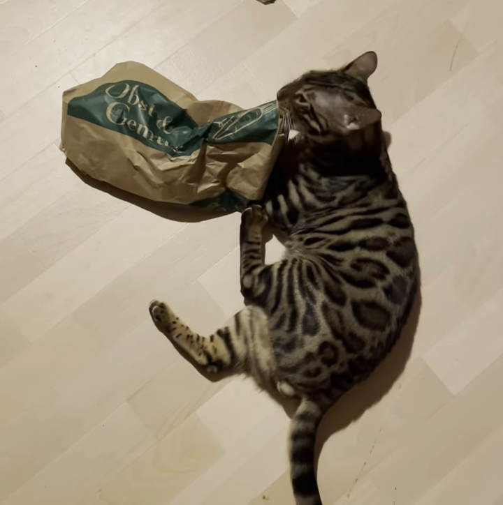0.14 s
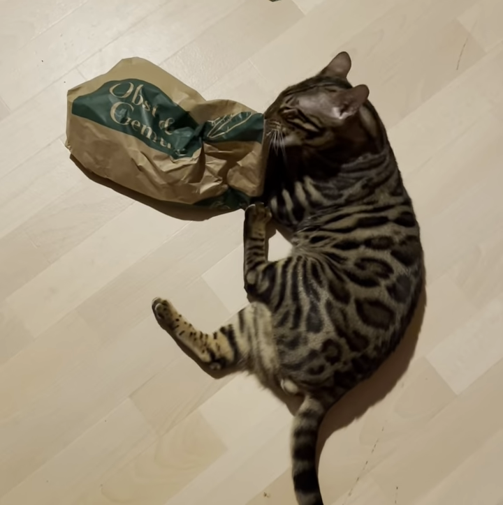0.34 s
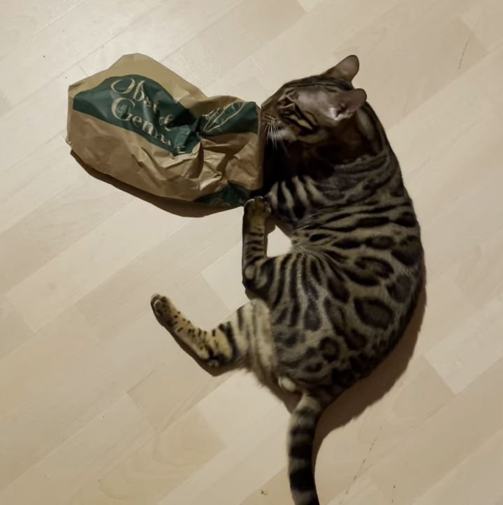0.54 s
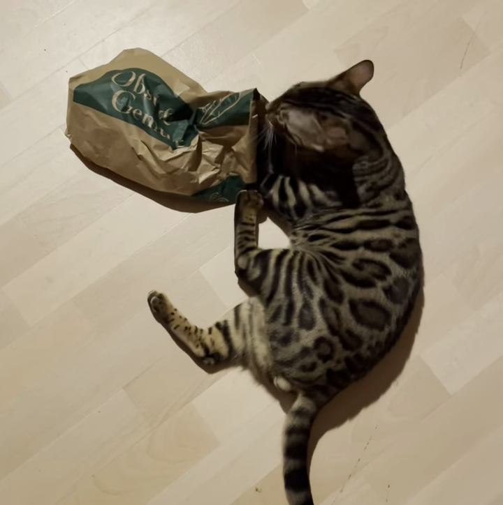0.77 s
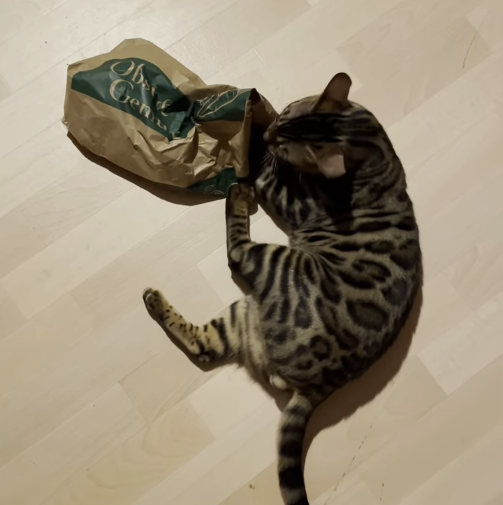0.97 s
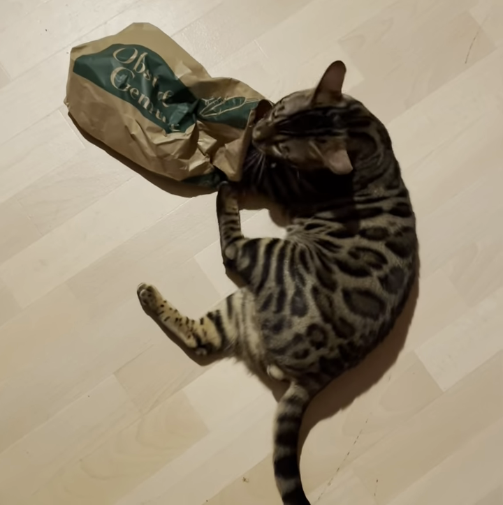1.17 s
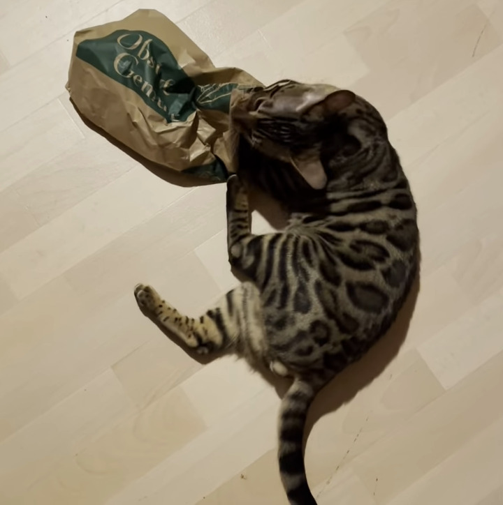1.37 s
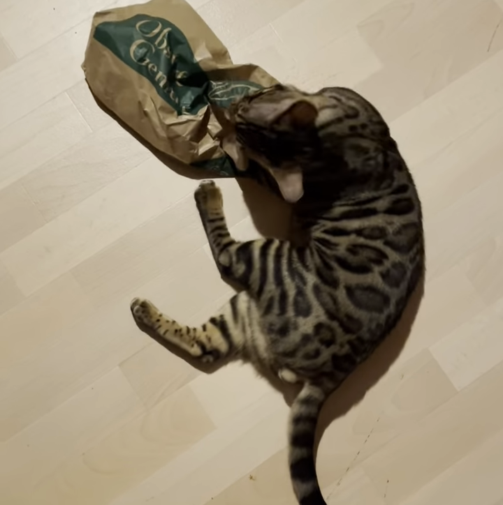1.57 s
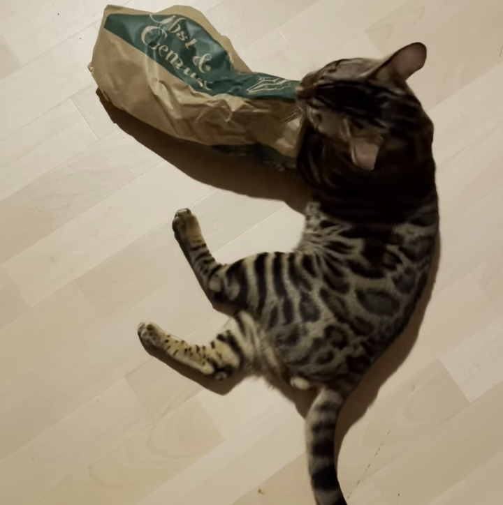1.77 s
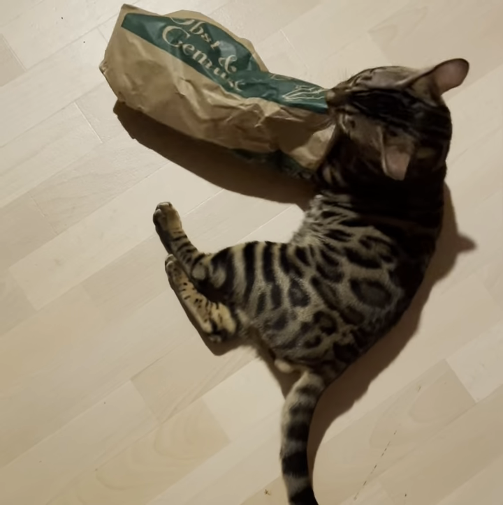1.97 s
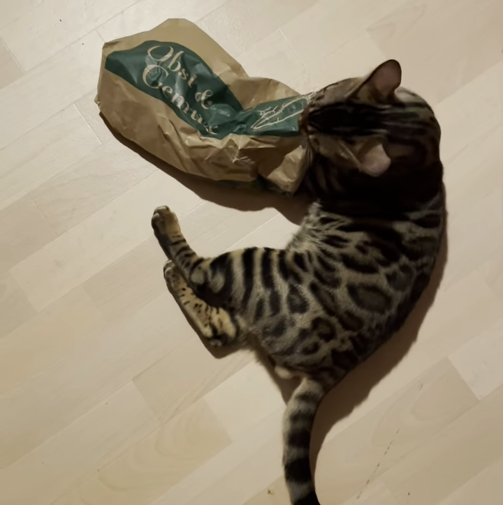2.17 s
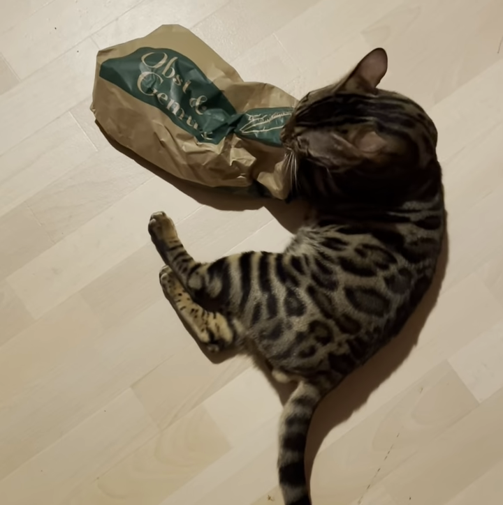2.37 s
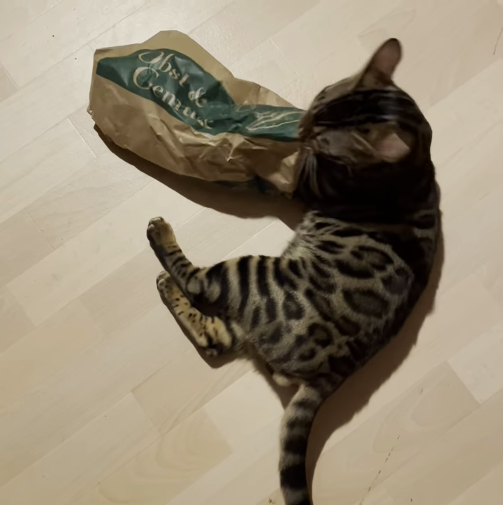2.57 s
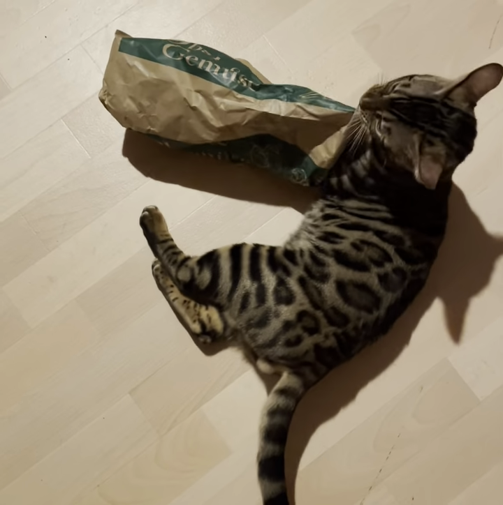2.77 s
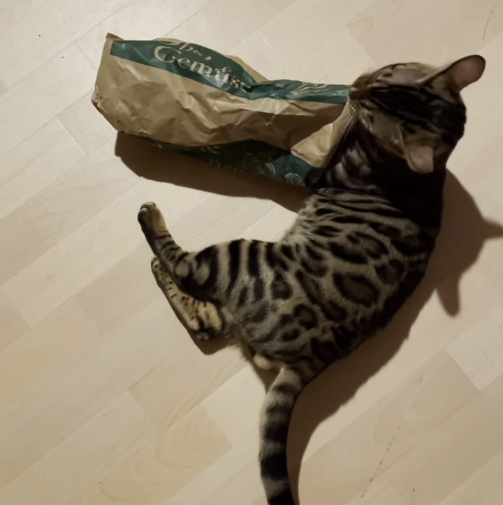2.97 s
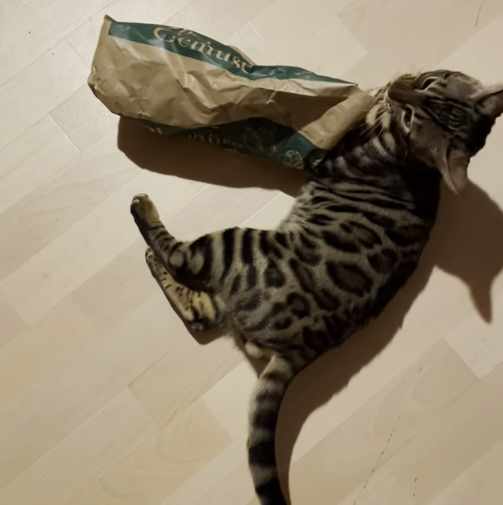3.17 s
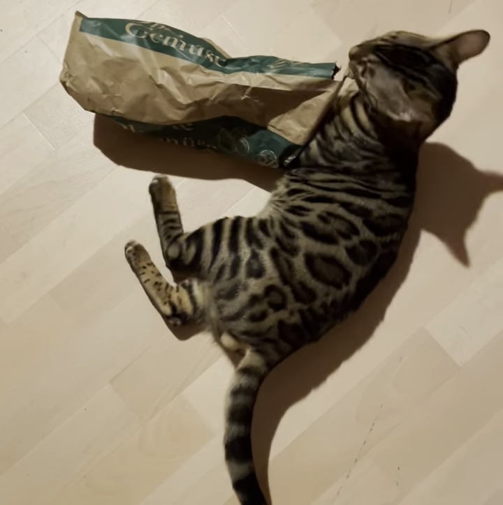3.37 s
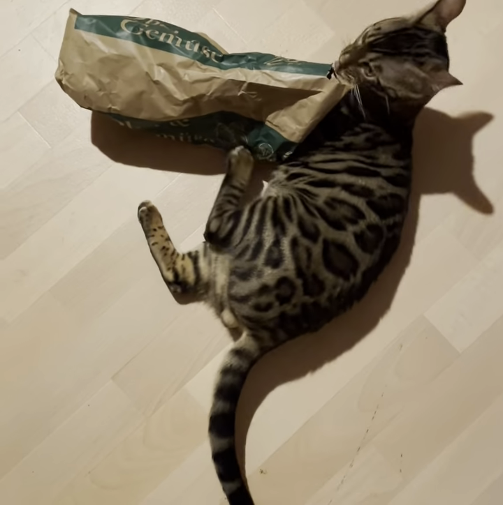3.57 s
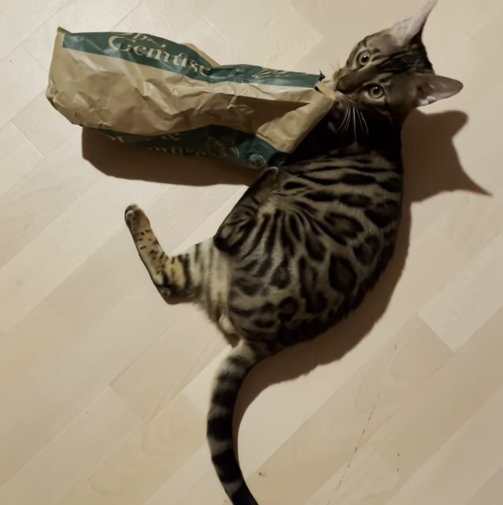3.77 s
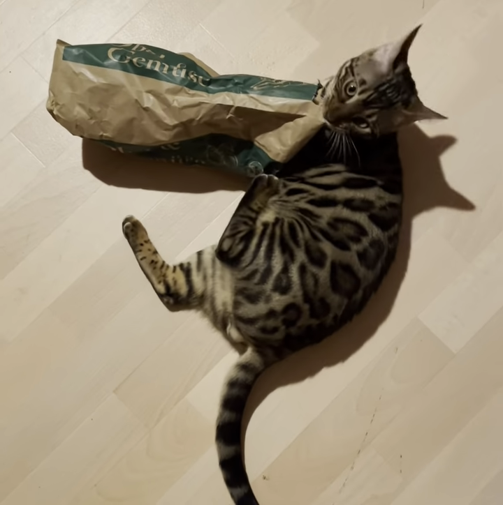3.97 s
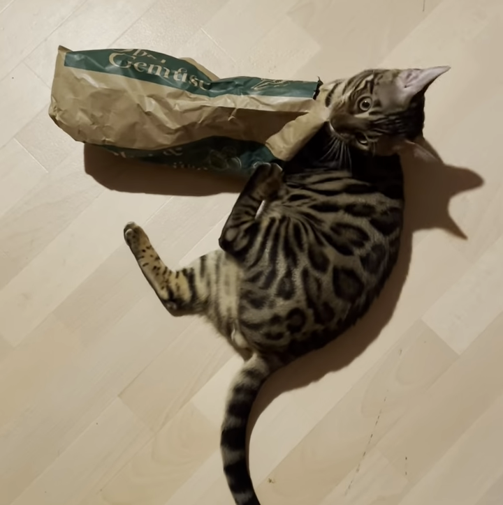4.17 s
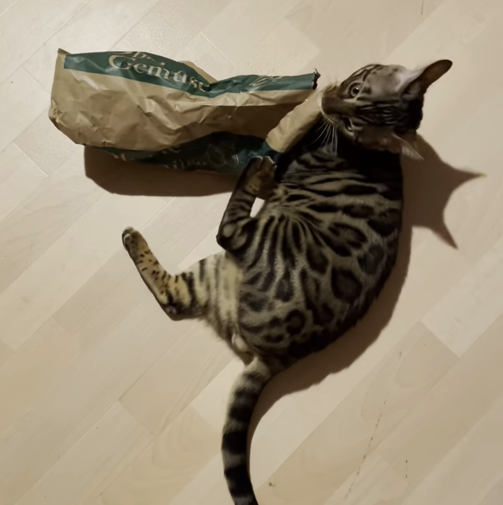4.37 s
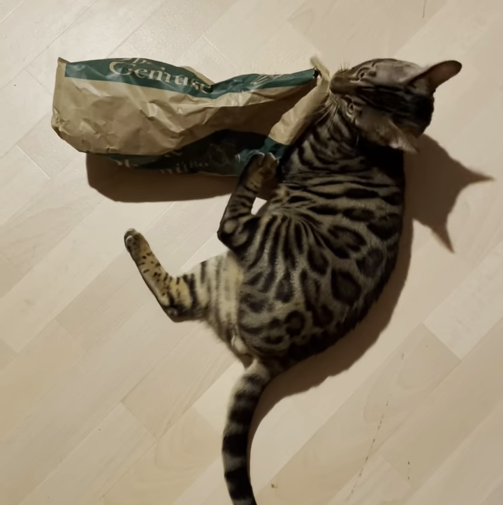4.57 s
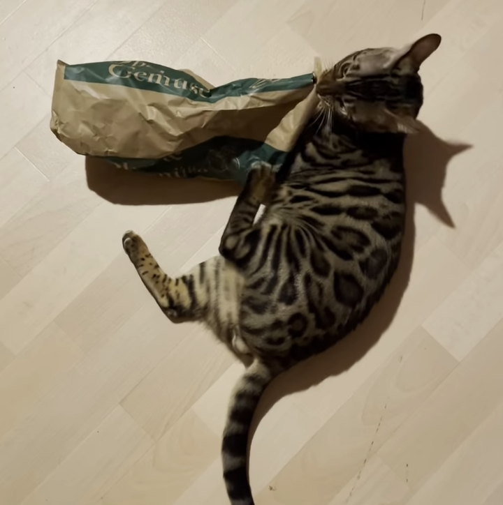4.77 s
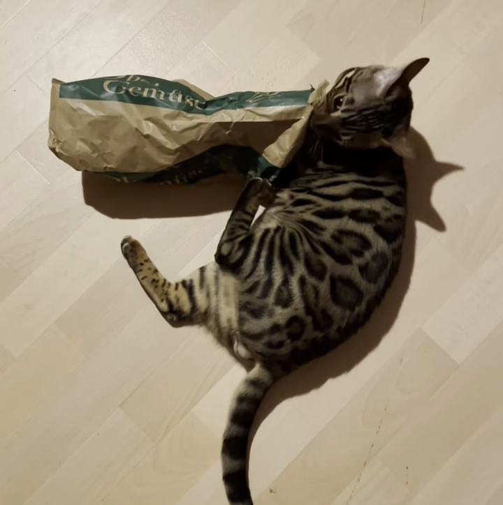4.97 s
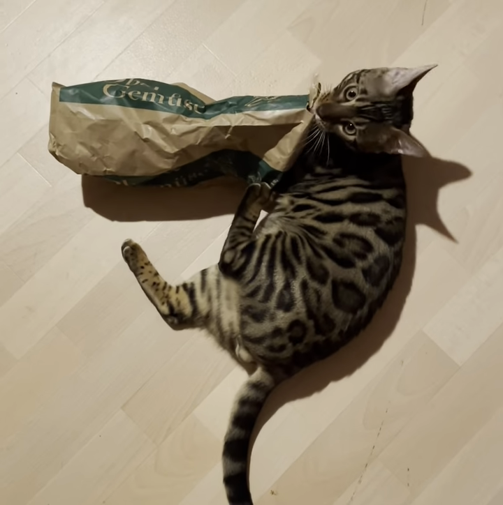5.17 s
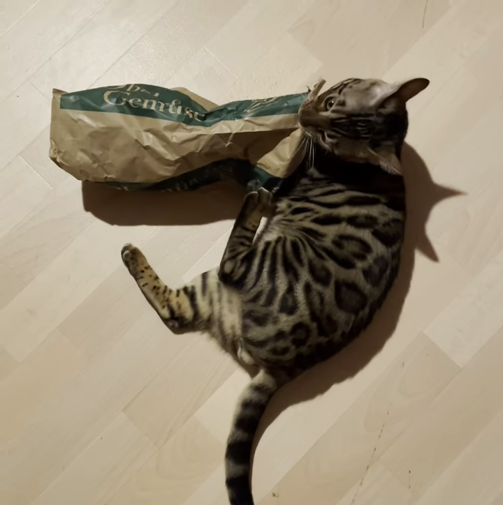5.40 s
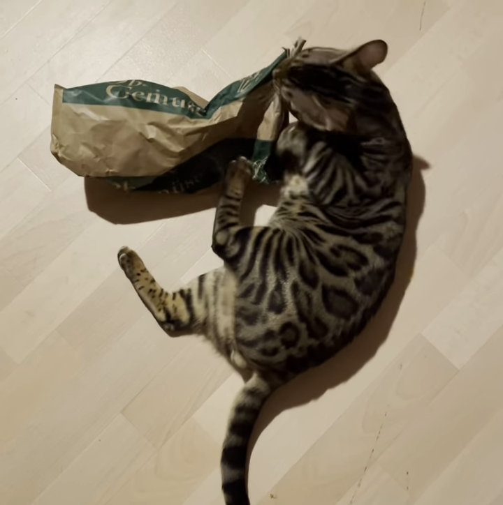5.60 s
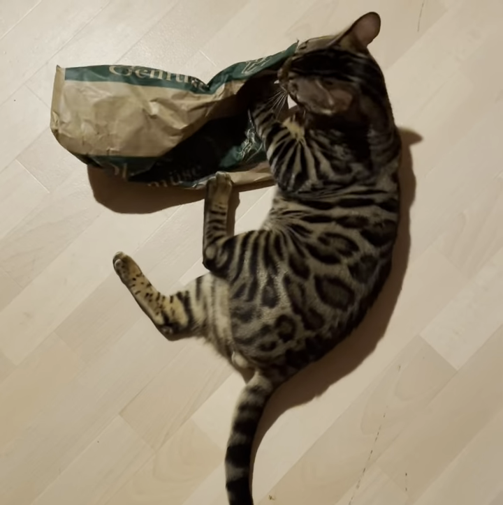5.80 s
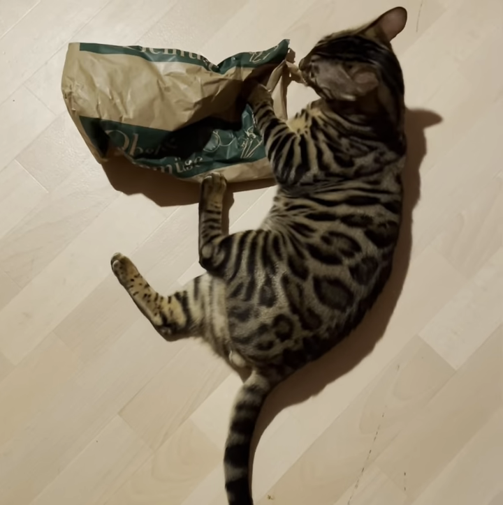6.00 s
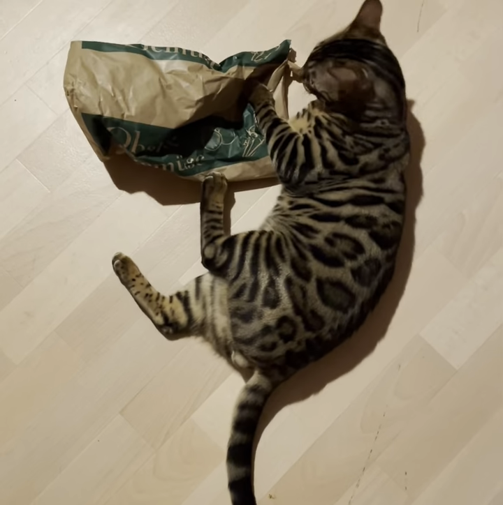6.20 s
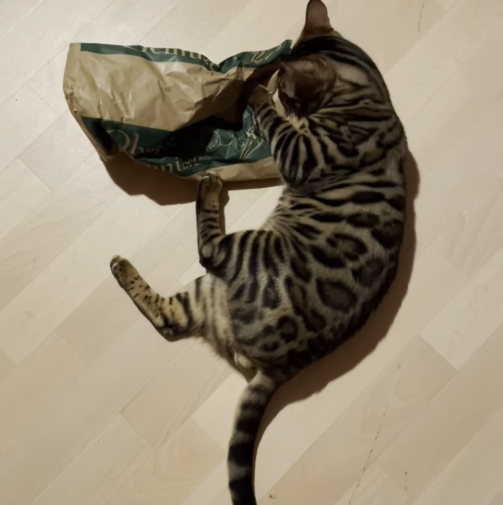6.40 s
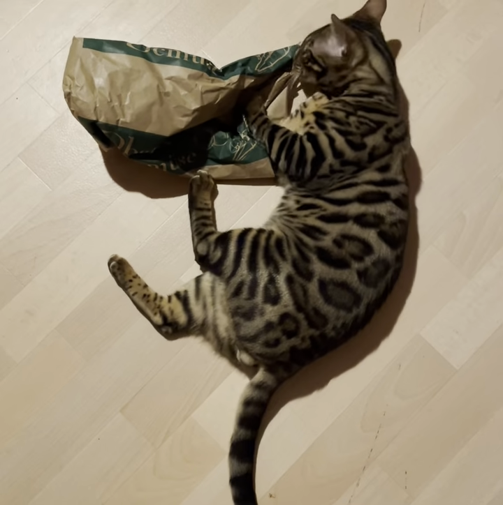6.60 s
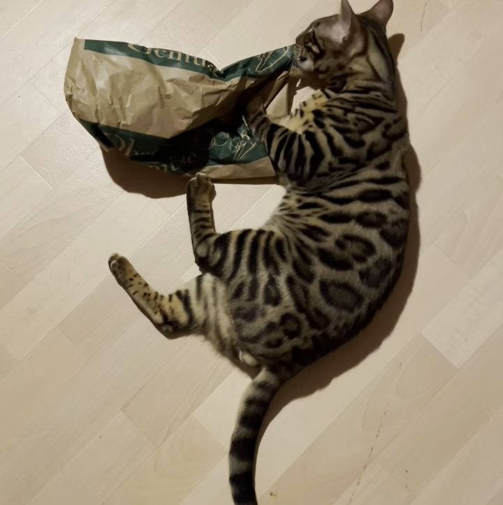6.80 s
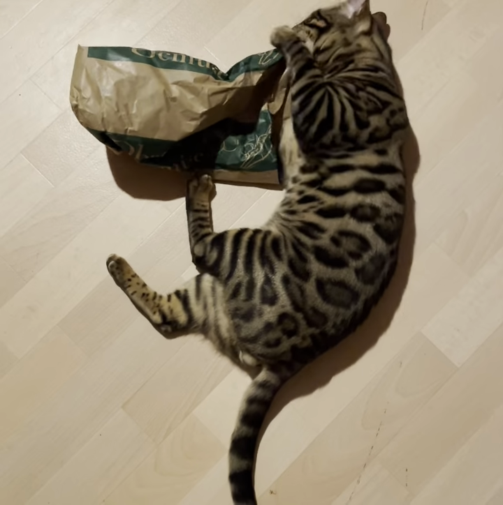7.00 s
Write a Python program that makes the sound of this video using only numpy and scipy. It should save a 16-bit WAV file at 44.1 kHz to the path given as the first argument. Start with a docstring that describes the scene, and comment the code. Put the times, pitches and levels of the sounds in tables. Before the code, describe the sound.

A cat chews and paws a stiff paper bag on a wooden floor, giving irregular bright crackles, sharp crease snaps and a few dull thumps.

```python
"""In a bare, lively room with a wooden floor, a cat lies chewing, tugging and pawing at a paper bag.
Creases snap as shaped noise bursts; folds, stiff creases and wide panels crackle under each move.
Short and long paper tones are noise through a narrow resonance, a tooth squeaks once as an unsteady
sine, and dull knocks and booming slaps come off the floor.
Decaying noise and standing waves give the room, over a faint steady hiss."""
import sys
import numpy as np
from scipy import signal
from scipy.fft import rfft, irfft, next_fast_len
from scipy.io import wavfile
from scipy.ndimage import uniform_filter1d

SR = 44100
rng = np.random.default_rng(int(sys.argv[2]) if len(sys.argv) > 2 else 0)


def int16_out(signal):
    """Quantize to a 16-bit WAV file."""
    q = np.round(np.clip(np.atleast_2d(signal).T, -1, 1) * 32767)
    wavfile.write(sys.argv[1], SR, q.astype(np.int16))


N = 310905


def amp(db):
    """Decibels to gain."""
    return 10 ** (np.asarray(db) / 20)


def unit(x):
    """Scale to rms 1."""
    return x / np.sqrt(np.mean(x ** 2) + 1e-20)


def along(points, hz):
    """Read (frequency, value) points on a log frequency axis."""
    point_hz, values = np.transpose(points)
    return np.interp(np.log(hz + 1), np.log(point_hz), values)


def curves(rows):
    """One value per sample for each column after the time."""
    times, *columns = np.transpose(rows)
    return [np.interp(np.arange(N) / SR, times, column) for column in columns]


def filtered(x, response):
    """Multiply the spectrum of x by a complex response of frequency."""
    n = x.shape[-1]
    padded = next_fast_len(n + SR // 2)
    spectrum = rfft(x, padded) * response(np.fft.rfftfreq(padded, 1 / SR))
    return irfft(spectrum, padded)[..., :n]


def coloured(x, spectrum, size=4096):
    """Causal minimum-phase filter of energy 1, so the table sets only the colour."""
    cepstrum = irfft(np.log(amp(along(spectrum, np.fft.rfftfreq(size, 1 / SR)))))
    # folding the cepstrum forward puts the energy as early as possible
    cepstrum[1:size // 2] *= 2
    cepstrum[size // 2:] = 0
    pulse = irfft(np.exp(rfft(cepstrum)))
    return signal.fftconvolve(x, pulse / np.linalg.norm(pulse))[:N]


# correlation of left and right in the diffuse noise, limited to -1..1 in use; opposed at the very top:
# (frequency [Hz], correlation [-])
CORRELATION = [(100, .998), (300, 0.95), (640, 0.81), (1400, 0.19), (3000, 0.32), (7000, -0.15),
               (11000, 0.79), (14000, -1.6)]


def diffuse(n):
    """Wide stereo noise: alike in the bass, loosely related above it, opposed at the very top."""
    def mid_side_gains(hz):
        turn = np.arccos(np.clip(along(CORRELATION, hz), -1, 1)) / 2
        return np.array([np.cos(turn), np.sin(turn)])

    mid, side = filtered(rng.standard_normal((2, n)), mid_side_gains)
    return np.array([mid + side, mid - side])


# colour of the room hiss: (frequency [Hz], relative level [dB])
AIR_COLOUR = [(25, -9), (45, 9.5), (70, -9.5), (98, 18.5), (125, 9), (200, 5), (500, 4.5), (1200, 3),
              (2500, 0), (5000, -3.5), (8000, -13), (13000, -8), (16000, -41.5)]


def air():
    """The faint steady hiss of the room, as coloured diffuse noise."""
    hiss = filtered(diffuse(N), lambda hz: amp(along(AIR_COLOUR, hz)))
    return amp(-77.0) * unit(hiss)


# how long the room rings: (frequency [Hz], time to fall 60 dB [s])
ROOM_DECAY = [(80, 0.15), (250, 0.41), (1000, 0.54), (4000, 0.52), (8000, 0.5), (14000, 0.28)]
# strength of the tail: (frequency [Hz], level relative to the direct sound [dB])
TAIL_LEVEL = [(100, 9.5), (500, -3), (1500, -1.5), (5000, -2), (10000, -1.5), (15000, 1)]


def room_tail():
    """The answer of the room: it builds up within milliseconds, and the middle lasts longest."""
    hz, t, noise = signal.stft(diffuse(SR), SR, nperseg=256)
    decay = amp(-60 * t / along(ROOM_DECAY, hz)[:, None])
    build_up = 1 - np.exp(-t / 0.0015)
    early = 1 + 1.0 * np.exp(-t / 0.021)  # floor and near walls answer first
    fade = decay * build_up * early
    fade *= amp(along(TAIL_LEVEL, hz))[:, None] / np.sqrt(SR * np.mean(fade ** 2, axis=1, keepdims=True))
    return signal.istft(noise * fade, SR, nperseg=256)[1]


# standing waves between the walls: (frequency [Hz], width [Hz], level before halving [dB])
STANDING_WAVES = [(76, 2.3, -9), (101.8, 7.9, 10.5), (135.9, 9.7, 12.5), (195.4, 6.3, 8.5)]


def standing_waves(hz):
    """Damped resonances between the walls, added to the plain response."""
    modes = sum(amp(db) * 1j * hz * width / (centre * centre - hz * hz + 1j * hz * width)
                for centre, width, db in STANDING_WAVES)
    return 1 + modes / 2


def room(x, count=10):
    """The echoes are drawn anew for each stretch as the bag moves about; the standing waves stay."""
    out = np.zeros((2, N + 2 * SR))
    for part in np.array_split(np.arange(N), count):
        wet = signal.fftconvolve(x[part][None], room_tail(), axes=1)
        out[:, part[0]:part[0] + wet.shape[1]] += wet
    return filtered(out[:, :N], standing_waves)


# balance of the direct sound: (frequency [Hz], left minus right [dB])
LEFT_BALANCE = [(200, 4.5), (500, -1.5), (1100, 0), (2000, 8), (4000, 0.5), (12000, 1)]


def direct_sound(bag):
    """The bag lies a little to the left: the left channel leads slightly, with its own tone balance."""
    lag_ms = 0.019

    def left(hz):
        # half the difference goes to each side
        return amp(along(LEFT_BALANCE, hz) / 2) * np.exp(1j * np.pi * hz * lag_ms / 10 ** 3)

    return filtered(bag, lambda hz: np.array([left(hz), 1 / left(hz)]))


def crackle(rate, spread_db, t60, rub_db):
    """Tiny bursts of very unequal size at random moments, over the even hiss of sliding paper; rms 1."""
    starts = rng.random(N) < rate / SR  # rate in bursts per second
    sizes = amp(spread_db * np.clip(rng.standard_normal(N), -2, 2))
    fade = amp(-60 * np.arange(SR // 10) / SR / t60)
    power = np.abs(signal.fftconvolve(starts * sizes ** 2, fade ** 2)[:N])
    envelope = np.sqrt(power / power.mean() + amp(rub_db) ** 2)
    return unit(envelope * rng.standard_normal(N))


# every move takes hold quickly, eases off while it lasts, and then the paper settles
ATTACK_DB_PER_S, EASE_DB_PER_S, SETTLE_DB_PER_S = 596, 10, 245.5


def efforts(moves):
    """One gain curve for each level column: every move rises, holds with a slight sag, and settles."""
    t = np.arange(N) / SR
    power = np.zeros((len(moves[0]) - 2, N))
    for start, length, *levels_db in moves:
        near = slice(max(0, round(start * SR) - SR // 4), round((start + length) * SR) + SR // 2)
        age = t[near] - start
        attack_db = ATTACK_DB_PER_S * np.minimum(age, 0)  # the rise comes before the start time
        ease_db = EASE_DB_PER_S * np.maximum(age, 0)
        settle_db = SETTLE_DB_PER_S * np.maximum(age - length, 0)
        power[:, near] += np.outer(amp(levels_db), amp(attack_db - ease_db - settle_db)) ** 2
    return np.sqrt(power)


# the cat rolls its weight onto the floor: (start time [s], length [s], level [dB])
WEIGHT_SHIFTS = [(.02, 1, -80), (1.05, 0.18, -79), (1.48, .04, -77), (1.69, 0.23, -74.5),
                 (2.02, 0.063, -73), (2.67, 0.32, -65.5), (3.02, 0.089, -63), (3.2, 0.085, -69),
                 (3.48, 0.13, -78), (3.93, 0.13, -83), (4.42, 0.07, -83), (4.98, 0.07, -72.5),
                 (5.58, .1, -79), (5.92, .08, -73), (7.02, .05, -84)]
# colour of the knocks: (frequency [Hz], relative level [dB])
KNOCK_COLOUR = [(25, -34), (50, -27), (75, -7), (130, -1.5), (180, -4.5), (300, -5), (600, -20.5),
                (2000, -53.5)]


def knocks():
    """Soft, dull knocks of paws and bag on the boards, as slow crackle with the treble taken off."""
    weight, = efforts(WEIGHT_SHIFTS)
    return coloured(weight * crackle(rate=80, spread_db=3, t60=.05, rub_db=-5), KNOCK_COLOUR)


# the bag is slapped against the floor: (time [s], level [dB])
SLAPS = [(2.736, -47.5), (5.926, -63.5)]
# boards and the air inside the bag: (frequency [Hz], relative level [dB], time to fall 60 dB [s])
BOOM_MODES = [(79, -8, .12), (102.3, -23, 0.15), (136.4, -26, 0.48), (173, -1.5, 0.15), (204, -0.5, 0.39),
              (340, 17, 0.041), (422, 6.5, 0.16)]


def slaps():
    """Each slap sets the boards and the air in the bag booming, as a sum of decaying sines."""
    out = np.zeros(N)
    t = np.arange(SR // 4) / SR
    ringing = sum(amp(db - 60 * t / t60) * np.sin(2 * np.pi * hz * t) for hz, db, t60 in BOOM_MODES)
    boom = ringing * (1 - np.exp(-t / 0.0013))
    for s, db in SLAPS:
        out[round(s * SR):][:len(t)] += amp(db) * boom
    return out


# stick and slip of a tooth on paper: (time [s], pitch [Hz], level [dB])
TOOTH_SLIP = [(2.019, 6860, -70), (2.025, 7130, -37), (2.037, 7350, -39), (2.047, 6850, -35),
              (2.06, 7040, -41), (2.072, 6900, -70)]


def squeak():
    """The paper slips under a tooth at a high, unsteady rate."""
    pitch_hz, db = curves(TOOTH_SLIP)
    jitter = .048 * unit(uniform_filter1d(rng.standard_normal(N), size=24))  # fraction of the pitch
    t = np.arange(N) / SR
    sounding = (t > TOOTH_SLIP[0][0]) & (t < TOOTH_SLIP[-1][0])
    phase = 2 * np.pi * np.cumsum(pitch_hz * (1 + jitter)) / SR
    return sounding * amp(db) * np.sin(phase)


# short and long narrow-band noises of the paper:
# (middle time [s], half length [s], pitch [Hz], level [dB])
NARROW_NOISES = [(0.528, 0.011, 1050, -64.5), (1.28, 0.0023, 930, -43.5), (2.05, .016, 8200, -47),
                 (3.91, 0.0042, 4640, -50), (4.432, 0.012, 945, -56), (4.748, 0.023, 960, -60),
                 (4.756, .013, 1650, -58), (5.615, 0.088, 930, -58.5), (6.066, 0.055, 7900, -55.5),
                 (6.075, 0.049, 6150, -51), (6.375, 0.012, 990, -60), (6.544, 0.024, 1740, -47.5),
                 (6.578, .03, 1110, -69)]


def narrow_paper_noises():
    """Noise swells and fades through one narrow resonance, so the paper briefly takes on a pitch."""
    out = np.zeros(N)
    t = np.arange(-SR // 6, SR // 6) / SR
    for s, half, hz, db in NARROW_NOISES:
        swell = np.exp(-(t / half) ** 2)
        ring = signal.lfilter(*signal.iirpeak(hz, Q=7, fs=SR), swell * rng.standard_normal(len(t)))
        level = amp(db) * np.linalg.norm(swell) / np.linalg.norm(ring)
        out[round((s + t[0]) * SR):][:len(t)] += level * ring
    return out


def shifting_colour(x, depth_db, size=256):
    """Every fold that moves has its own broad resonances, so the colour changes from moment to moment."""
    z = signal.stft(x, nperseg=size)[2]
    field = uniform_filter1d(rng.standard_normal(z.shape), size=5, axis=0)  # smooth over frequency
    field = uniform_filter1d(field, size=5, axis=1)  # and over time
    gains = unit(amp(depth_db * unit(field)))
    return signal.istft(z * gains, nperseg=size)[1][:N]


# bites, tugs and pats that work the bag: (start time [s], length [s],
# small folds level [dB], stiff creases level [dB], wide panels level [dB])
BAG_MOVES = [(0, 0.034, -60, -61.5, -75), (.17, 0.022, -67, -65.5, -69), (.33, 0.14, -62.5, -66.5, -72),
             (.62, 0.046, -65, -70.5, -75), (.74, 0.083, -59, -62.5, -67.5), (.97, 0.13, -55.5, -57.5, -62),
             (1.12, 0.071, -51, -55, -59), (1.26, 0.38, -59, -66, -65.5), (1.48, 0.052, -54, -51, -54),
             (1.58, 0.21, -49, -51.5, -58.5), (1.69, 0.27, -46, -46, -50.5), (2.02, 0.047, -43, -45, -49),
             (2.15, 0.076, -66, -61.5, -66), (2.32, 0.03, -61.5, -64.5, -81), (2.45, 0.015, -73, -74, -77),
             (2.595, 0.11, -48.5, -47.5, -63), (2.69, .1, -44.5, -43, -46), (2.84, 0.24, -61, -62, -63),
             (3.045, 0.054, -41.5, -46, -48.5), (3.16, 0.14, -63, -55, -61), (3.42, 0.036, -60, -59, -62),
             (3.558, 0.012, -49.5, -46.5, -54), (3.68, 0.036, -58.5, -67.5, -86),
             (3.85, .27, -60, -77.5, -76.5), (4.28, 0.071, -60.5, -73, -80), (4.41, 0.036, -54, -65.5, -65),
             (4.73, .15, -62.5, -65, -68.5), (4.945, 0.16, -59.5, -57, -62), (5.32, 0.1, -63.5, -74.5, -77),
             (5.46, 0.12, -58, -69, -73.5), (5.57, 0.14, -51.5, -70, -62), (5.72, 0.13, -43.5, -46, -57),
             (5.93, 0.045, -41, -41.5, -48), (6.05, 0.049, -52, -53, -55.5),
             (6.29, 0.22, -67.5, -61, -72.5), (6.41, .06, -50, -57, -80), (6.53, 0.087, -54, -57, -82),
             (6.69, 0.07, -65, -95, -84), (6.88, 0.17, -54.5, -65.5, -75.5), (7.025, .05, -50, -50.5, -55)]
# colours of small folds, stiff creases and wide panels: (frequency [Hz], relative level [dB])
FOLD_COLOUR = [(500, -26.5), (1400, -4), (2200, 1), (3000, -1), (4700, 6.5), (7000, 0), (10500, -3),
               (13000, -8), (16000, -21.5)]
CREASE_COLOUR = [(350, -36.5), (620, -24), (850, -1), (1100, 1.5), (1500, -1), (2200, -4), (3200, -5.5),
                 (10000, -60)]
PANEL_COLOUR = [(110, -41.5), (200, -8), (350, 0), (550, 1.5), (720, 1), (1100, -15.5), (2200, -35),
                (10000, -60.5)]


def crinkle():
    """Small folds give dense bright ticks, stiff creases clack, and wide panels buckle hollowly."""
    on_folds, on_creases, on_panels = efforts(BAG_MOVES)
    folds = coloured(on_folds * crackle(rate=500, spread_db=9.0, t60=0.012, rub_db=-1.5), FOLD_COLOUR)
    creases = coloured(on_creases * crackle(rate=320, spread_db=8.0, t60=0.012, rub_db=0.0), CREASE_COLOUR)
    panels = coloured(on_panels * crackle(rate=200, spread_db=5.5, t60=0.013, rub_db=-4), PANEL_COLOUR)
    return shifting_colour(folds + creases + panels, depth_db=4)


# creases that give way: (time [s], level [dB], panel pop relative to the crack [dB],
# crisp edge relative to the crack [dB], time to fall 60 dB [s], crack pitch [Hz])
CREASE_SNAPS = [(.5994, -53, -17, 4, 0.013, 5900), (.7393, -46.5, -7, -8, 0.024, 4900),
                (.7631, -36.5, -21, -13, .009, 3350), (0.8935, -47, -17, -14, .01, 4300),
                (.946, -48.5, -2, -4.5, 0.04, 2880), (1.1267, -32, -7, -7.5, 0.022, 4100),
                (1.138, -25.5, -15, -7.5, 0.0084, 4670), (1.2376, -41, -8.5, 1, 0.0065, 4300),
                (1.3762, -40, -15, -7, 0.0095, 4500), (1.3788, -35, -0.5, -14, 0.0085, 4330),
                (1.4679, -39, -7, -6, 0.017, 4570), (1.4759, -31.5, 0.5, -10, 0.015, 4000),
                (1.572, -41.5, -2, -1, 0.021, 4200), (1.6388, -23.5, -7, -12, 0.0045, 3750),
                (1.6792, -34, 0, -6, 0.025, 3430), (1.692, -37, 0.5, -5, 0.032, 2900),
                (1.7253, -38, 11.5, -18, 0.027, 3040), (1.7433, -29.5, -17, -7.5, 0.0063, 3300),
                (1.802, -35, 3.5, -5, 0.017, 3120), (1.8723, -24.5, -5, -8, 0.011, 3160),
                (1.8909, -33, -3.5, -1, 0.033, 4100), (1.8992, -28.5, -0.5, -11, 0.013, 4460),
                (2.2, -41, -7, -2, 0.019, 4000), (2.5703, -39.5, -8, -9, 0.03, 2500),
                (2.5947, -37, -4, -18, 0.015, 3530), (2.6869, -43.5, 2, -7, 0.093, 3300),
                (2.726, -20.5, -10.5, -6.5, 0.033, 4160), (2.7326, -29, 5.5, -5, 0.035, 4740),
                (2.876, -40, -22, -17, 0.019, 2260), (2.9135, -40, -11, -10.5, 0.019, 4430),
                (2.936, -36.5, -26, -4.5, 0.015, 4840), (2.9864, -32, -5, -12, 0.0084, 3940),
                (3.0168, -42, 0.5, -5, .032, 2500), (3.042, -42, 1, 2, 0.013, 4240),
                (3.0792, -30.5, -6, 1.5, 0.011, 3450), (3.0858, -34, -6, -1.5, 0.047, 2930),
                (3.1569, -37.5, -2.5, 0, 0.074, 4100), (3.2167, -42, 8, -5, 0.011, 3200),
                (3.2762, -39.5, -5, -12, 0.017, 4500), (3.3178, -55, 15, -12, .012, 2770),
                (3.425, -46.5, -1, -2, 0.014, 4500), (3.537, -34, -9, -13, 0.0056, 4370),
                (3.5536, -36.5, -7.5, -6, 0.033, 3850), (3.8403, -41, -17, -0.5, 0.0076, 6640),
                (3.9019, -32.5, -15, -6.5, 0.011, 4040), (3.9962, -45.5, -6, -6, 0.008, 4350),
                (4.267, -55, -8, -16.5, 0.025, 2350), (4.7931, -44.5, 5.5, -6.5, 0.012, 2250),
                (4.9188, -45, -12, -24, .009, 4950), (4.943, -41.5, 3.5, -11, 0.042, 3500),
                (4.987, -44.5, 8.5, -23, 0.012, 2660), (4.994, -41.5, -9, 4.5, 0.0088, 4680),
                (5.007, -45.5, 4, -9, 0.018, 4220), (5.0793, -48, -15, -3.5, 0.067, 3720),
                (5.1604, -45.5, -17, -2, 0.01, 3630), (5.496, -44, -14, 8, 0.0067, 4600),
                (5.6045, -35.5, -18, -9, 0.015, 4600), (5.6356, -32.5, -22, -20, 0.0093, 4850),
                (5.6817, -39, -17, 0, .039, 5100), (5.7054, -16, -14.5, -10.5, 0.0058, 5160),
                (5.7495, -38, -9, -14, .011, 2900), (5.7561, -26.5, -15, -8, 0.0053, 4400),
                (5.8401, -45, -2, 0, 0.031, 3320), (5.8734, -29, -5.5, -5, .009, 2270),
                (5.9078, -31, -4, -3, 0.019, 3200), (5.9127, -28, -5, -3.5, 0.032, 3030),
                (5.9184, -25.5, -3, -4.5, 0.047, 4700), (5.922, -33, -13, -10, 0.022, 4200),
                (5.9938, -27.5, -5.5, -14, 0.013, 5150), (6.3298, -44, -15, -22, 0.0078, 4000),
                (6.4195, -58, 0, -8, 0.05, 3400), (6.4579, -38, -12, -3, 0.0066, 3260),
                (6.5164, -33, -27, -9, 0.0096, 4700), (6.524, -32.5, -6, 1, 0.016, 3200),
                (6.6114, -39, -20, -1.5, 0.0087, 3620), (7.0144, -42, 3, -15, 0.011, 4200),
                (7.0192, -30.5, -5.5, -7, .02, 4940)]


def snaps():
    """Each crease lets go in a short burst: a panel pop, a crack of its own pitch and a crisp edge."""
    t = np.arange(-SR // 50, SR // 12) / SR
    age = np.maximum(t, 0)
    out = np.zeros(N + SR)
    for s, db, pop_db, edge_db, t60, crack_hz in CREASE_SNAPS:
        fade = amp(-60 * age / t60) * (t >= 0)
        rise = 1 - np.exp(-age / (0.24 * t60 ** 2))  # a long crease takes longer to get going
        # pop, crack and edge: (low Hz, high Hz, dB, filter order)
        parts = [(680, 1550, pop_db, 3),
                 (crack_hz * .68, crack_hz * 1.4, 0, 2),
                 (6800, 12500, edge_db, 2)]
        for low_hz, high_hz, part_db, order in parts:
            spectrum = rfft(fade * rise * rng.standard_normal(len(t)))
            # even out the chance ripple of each short noise draw, so its tail sounds smooth
            even = irfft(spectrum / (np.abs(spectrum) + 1e-9) ** .6, len(t))
            burst = signal.lfilter(*signal.butter(order, [low_hz, high_hz], "band", fs=SR), even)
            level = amp(db + part_db) * np.linalg.norm(fade) / np.linalg.norm(burst)
            out[round((s + t[0]) * SR):][:len(t)] += level * burst
    return out[:N]


def scene():
    """The bag heard directly and through the room, over the hiss."""
    bag = knocks() + slaps() + squeak() + narrow_paper_noises() + crinkle() + snaps()
    return air() + room(bag) + direct_sound(bag)


# overall tone: (frequency [Hz], level [dB])
OVERALL_TONE = [(25, -16), (45, -28.5), (70, 0.5), (12500, -1), (14000, 5), (15200, -14)]
TOP_HZ = 16200


def record(dry):
    """Deep bass is cut, and the top treble lifts, falls and ends at 16.2 kHz."""
    return filtered(dry, lambda hz: amp(along(OVERALL_TONE, hz)) * (hz < TOP_HZ))


dry = scene()
out = record(dry)
int16_out(out)
```